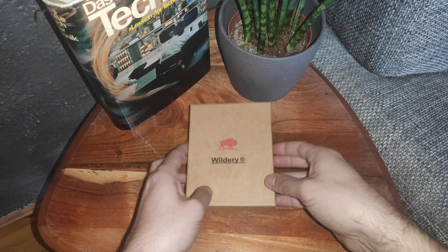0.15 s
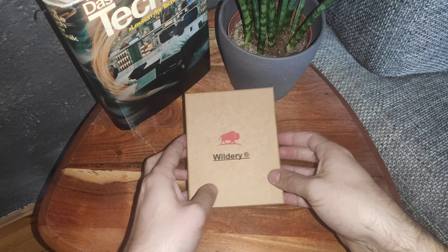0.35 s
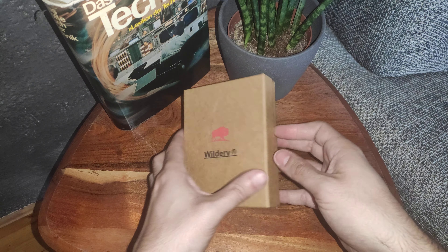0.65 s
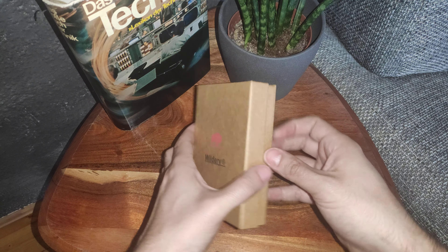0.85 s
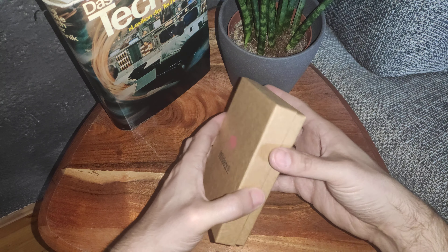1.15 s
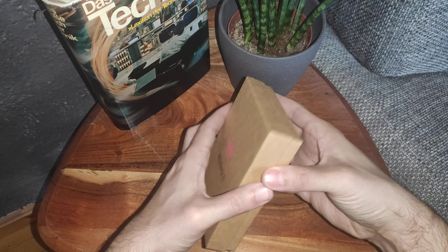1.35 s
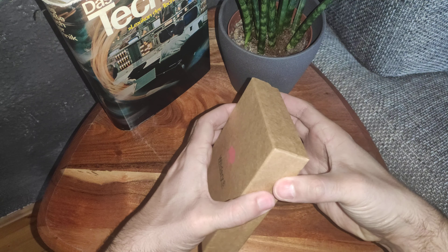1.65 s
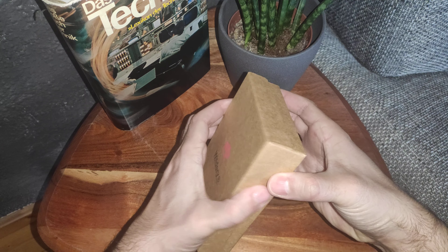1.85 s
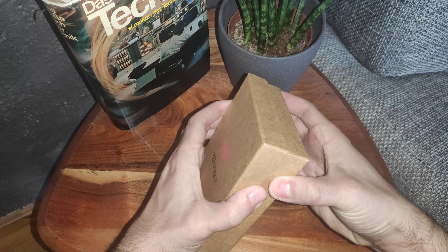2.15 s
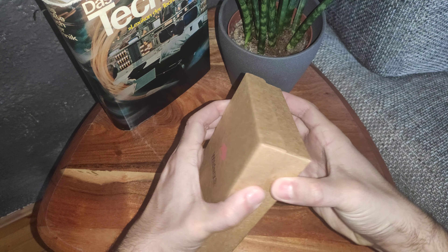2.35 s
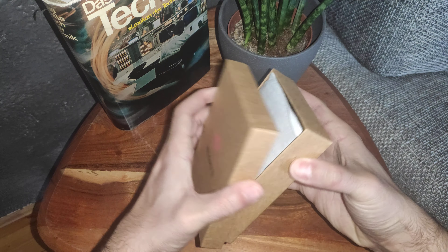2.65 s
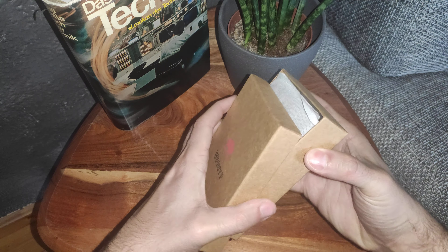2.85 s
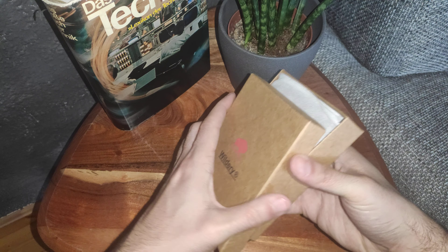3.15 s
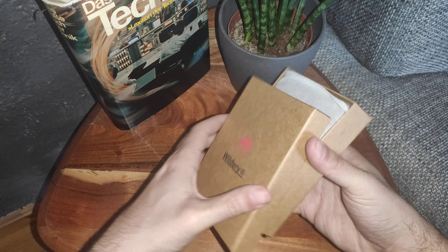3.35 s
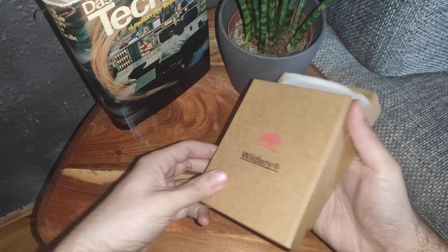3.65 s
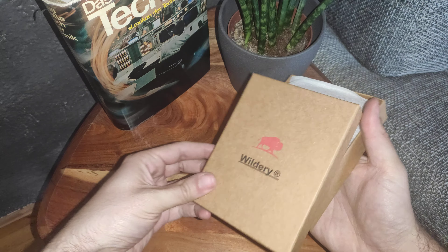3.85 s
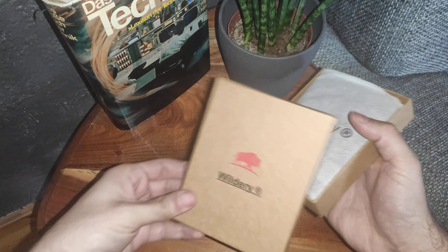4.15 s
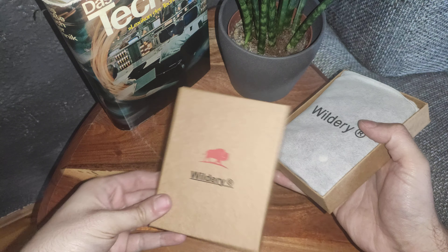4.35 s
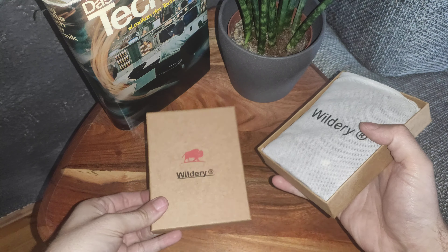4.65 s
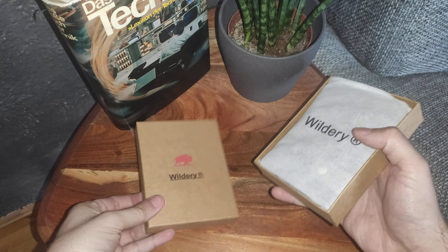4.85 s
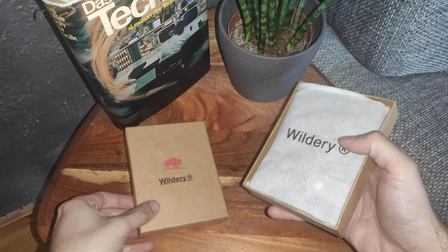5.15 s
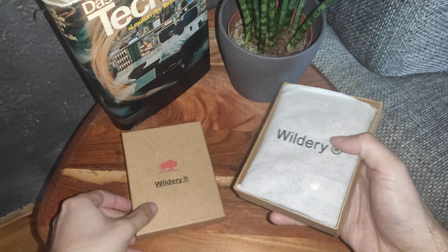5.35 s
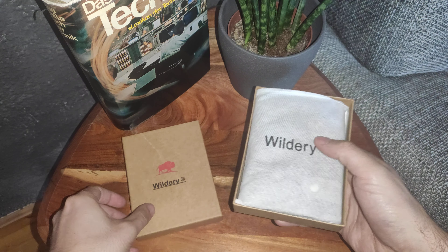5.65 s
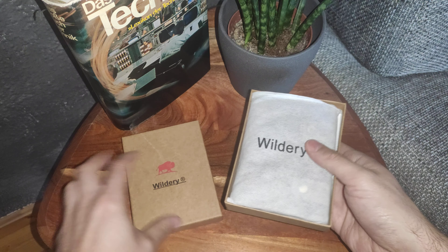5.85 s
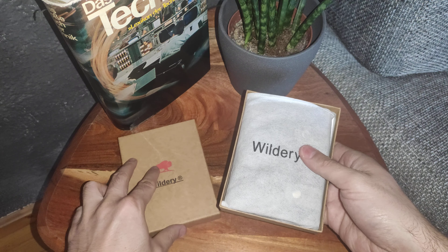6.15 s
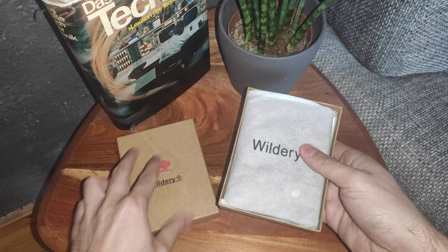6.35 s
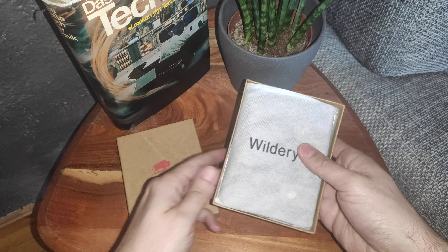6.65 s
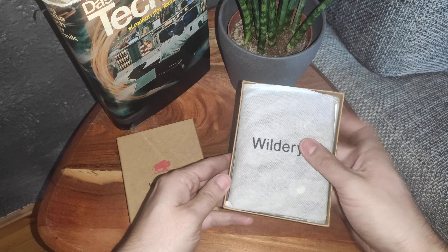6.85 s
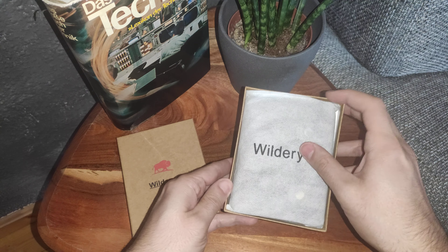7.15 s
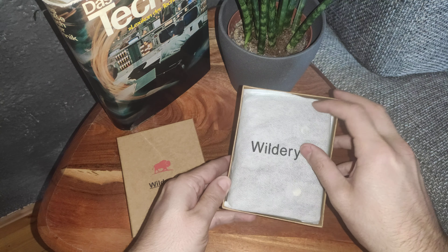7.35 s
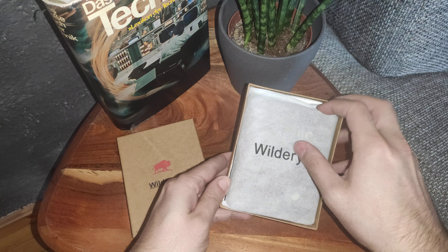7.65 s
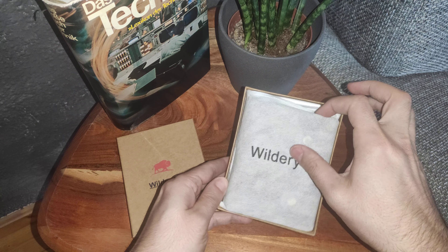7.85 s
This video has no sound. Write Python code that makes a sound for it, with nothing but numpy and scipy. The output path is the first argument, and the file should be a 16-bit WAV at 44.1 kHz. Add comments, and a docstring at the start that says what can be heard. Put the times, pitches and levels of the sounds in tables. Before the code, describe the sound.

Fingers brush and slip on a small hollow cardboard box, snapping and scraping as they work the lid loose and draw it off. The lid lands on a wooden table with a few sharp knocks, the loudest sounds here, and squeaks faintly before light handling resumes. The microphone is close, the sound leans left, and the small room adds a short, soft echo above a low hiss.

```python
"""Dry rubbing and fingertip ticks, close up: hands turn a small cardboard box and slide its lid off.
Skin hisses on the board, edges scrape, the panels hum and the hollow box booms; slips snap and thump.
About five seconds in, the lid knocks and bounces on a wooden table, then squeaks on the varnish.
A small soft room answers, over the microphones' own hiss and slow rumble."""
import sys
import numpy as np
from scipy import signal
from scipy.fft import rfft, irfft, next_fast_len
from scipy.io import wavfile
from scipy.ndimage import uniform_filter1d, map_coordinates

SR = 44100
rng = np.random.default_rng(int(sys.argv[2]) if len(sys.argv) > 2 else 0)


def put_to_file(sound):
    """Save the sound as 16-bit audio at rate SR, in the file named by the first command-line argument."""
    columns = np.atleast_2d(sound).T  # one column per channel
    safe = np.clip(columns, -1, 1)
    whole_steps = np.round(safe * 32767)
    wavfile.write(sys.argv[1], SR, whole_steps.astype(np.int16))


N = 353241

# Levels are relative; each layer adds its own trim.
# hand strokes: t/s, length/s, crest/share of length, panel level/dB,
# skin, edge and hollow levels re panel/dB, panel resonance/Hz
HAND_STROKES = [(0.096, 0.11, 0.23, -69, -14, -2, -0.5, 1450), (0.27, 0.11, 0.37, -83.5, 4, -3, 5.5, 650),
                (0.358, 0.06, 0.7, -72.5, 1, -12, -2, 650), (0.502, 0.21, 0.04, -73, 3.5, -5, 2, 690),
                (0.65, 0.23, 0.47, -63, -11.5, -7.5, -3.5, 1870),
                (0.828, 0.063, 0.45, -64.5, 2, 3, 3, 1610), (0.951, 0.096, 0.46, -52.5, -8, -4, -3, 1670),
                (1.018, 0.088, 0.5, -73, 8.5, 8, -12.5, 1530),
                (1.085, 0.29, 0.1, -74.5, 12.5, 5, -7.5, 1460),
                (1.288, 0.13, 0.87, -72, 10, 3.5, -10, 1500), (1.408, 0.086, 0.48, -69, 10, 2.5, -15, 1560),
                (1.513, 0.072, 0.55, -72.5, 4, 3.0, -6, 2100),
                (1.588, 0.084, 0.37, -66.5, 0.5, 4.0, -13.0, 2110),
                (1.646, 0.13, 0.42, -63, -9.5, -9, 7, 800),
                (1.777, 0.097, 0.28, -51.5, -14.5, -9, 0.5, 950),
                (1.949, 0.07, 0.12, -46.5, -18, -11, 1, 703), (2.001, 0.047, 0.2, -64, -20, -16, 15, 800),
                (2.045, 0.056, 0.07, -47.5, -14.5, -6.5, 4, 910),
                (2.191, 0.11, 0.2, -64.5, -16, -10, 6, 990),
                (2.279, 0.078, 0.4, -55.5, -20, -13, -1.5, 915),
                (2.344, 0.042, 0.15, -58, -19, -11, 9, 563),
                (2.418, 0.061, 0.75, -47, -16.5, -16, -1.5, 635), (2.447, 0.19, 0.2, -50, -6, 3, 1, 1950),
                (2.659, 0.18, 0.5, -56, -6.5, 3, -7, 760), (2.782, 0.11, 0.44, -56, -3.5, 5.0, -1, 1900),
                (2.877, 0.047, 0.5, -59.5, -9, 0.5, -3, 810), (2.971, 0.144, 0.9, -66.5, -2, -1, -5, 840),
                (3.106, 0.087, 0.36, -65.5, 6, 4, -5, 1900), (3.193, 0.11, 0.45, -58.5, -6.5, -2, -1, 1550),
                (3.266, 0.14, 0.67, -57.5, -5.5, 2, -7, 1290),
                (3.383, 0.14, 0.23, -63.5, -2.5, 4.5, -9, 1310),
                (3.48, 0.18, 0.48, -59, -1.5, 1.5, -22, 1270), (3.586, 0.31, 0.25, -58, 0.5, 2, -12, 1060),
                (3.798, 0.084, 0.4, -56.5, -6, -7, -20, 1260),
                (3.861, 0.18, 0.38, -50.5, -10.5, -7.5, -13, 1350),
                (3.998, 0.071, 0.47, -58.0, -9.0, -2, -14, 1270),
                (4.056, 0.17, 0.67, -46.5, -11, -4, -10.5, 1420),
                (4.179, 0.168, 0.3, -54.0, -9.5, 2.5, -5, 1390),
                (4.342, 0.372, 0.13, -78.5, 0.5, 1, -3.5, 695),
                (5.03, 0.06, 0.27, -76.0, 5.0, 9, -7.0, 1010),
                (5.096, 0.1, 0.24, -71.5, 3.5, 4, -7.0, 1010), (5.163, 0.17, 0.6, -61, -8.5, -4.5, -5, 990),
                (5.295, 0.14, 0.3, -60.5, -7, -1, -10.0, 905), (5.403, 0.16, 0.53, -61, -1, -5, -9, 870),
                (5.54, 0.23, 0.46, -62.5, -1.0, -1.5, -10, 940), (5.77, 0.2, 0.27, -75, 7, -7, -7.0, 740),
                (5.924, 0.18, 0.2, -69.5, 3, -4, -8, 890), (6.183, 0.11, 0.27, -57, -26, -13, -1.5, 773),
                (6.707, 0.12, 0.27, -77, 4, -7, -5, 760), (6.802, 0.19, 0.4, -68, 0.5, -5, -8, 730),
                (6.9, 0.14, 0.65, -68.5, 7.5, -4, -16, 2070),
                (7.02, 0.1, 0.3, -66.5, 3.0, 2.5, -16.5, 1730),
                (7.35, 0.06, 0.37, -68.5, -7, -0.5, -22, 795), (7.603, 0.17, 0.66, -71, -9, -14, -3.5, 710),
                (7.793, 0.15, 0.14, -68, -7.5, -8, -11, 1510),
                (7.922, 0.12, 0.58, -64, -6.5, -8.5, -17, 740)]
# the resting grip: panel, skin, edge and hollow levels/dB
GRIP_DB = (-83, -87.5, -81, -78)
# tone of skin on board: f/Hz, level/dB
SKIN_EQ = [(350, -36.5), (600, -25.5), (727, -9.5), (1190, -6), (2050, -1), (5340, -5), (8500, 4.5),
           (10300, -8), (13400, -6.5), (15700, -5.5)]
# tone of scraping edges: f/Hz, level/dB
EDGE_EQ = [(900, -37), (2000, -6.5), (3000, 1), (4000, 3.5), (4450, -1), (4900, 3), (6000, -3.5),
           (8800, -22), (10500, -36.5), (15000, -47.5)]
# rim resonances: f/Hz, width/Hz, boost/dB
RIM_PEAKS = [(2030, 140, 5.5), (2600, 88, 3), (3110, 140, 2.5), (3800, 92, 1.5), (4420, 150, 6.5)]
# tone of rubbed panels: f/Hz, level/dB
PANEL_EQ = [(250, -33), (750, -6.5), (1200, -8), (2200, -8.5), (3500, -19), (7000, -49)]
# air and walls of the box: f/Hz, width/Hz, level/dB
HOLLOW_PEAKS = [(134.6, 79, -6), (264, 120, -9), (344, 45, -4.5), (497, 83.7, 4), (668, 700, -3.5)]
# slips and fingertip ticks: t/s, level/dB, colour/Hz, treble/dB, thump/dB, t60/s
FINGER_SLIPS = [(0.806, -39.5, 1500, -26, -8, 0.071), (0.89, -40, 620, -20, -12, 0.033),
                (1.006, -37.5, 2640, -14.5, -30, 0.054), (1.258, -46.5, 1270, -7, -20, 0.047),
                (1.776, -49, 756, -31, -13, 0.056), (1.953, -37.5, 547, -7.5, -8, 0.083),
                (2.035, -42, 700, -38, -10, 0.038), (2.171, -51, 573, 3, -14, 0.14),
                (2.199, -49, 1060, -16, -10, 0.14), (2.289, -47.5, 950, -22, 3, 0.04),
                (2.335, -45.5, 797, -36, -6, 0.06), (2.422, -35.5, 520, -39, -20, 0.057),
                (2.534, -25.5, 563, -19, -2.5, 0.03), (2.686, -48, 810, -11, 7, 0.12),
                (2.815, -36, 2630, -36, -15, 0.042), (2.904, -45.5, 821, -6, -23, 0.039),
                (3.215, -41.5, 1500, -23, -17, 0.055), (4.078, -41, 2000, -36, -2, 0.045),
                (4.261, -33, 1330, -6.5, -2, 0.034), (7.378, -44, 794, -8, -28, 0.025),
                (7.471, -55.5, 745, -5.5, -3, 0.044), (7.551, -43.5, 1440, -24, -17, 0.044),
                (7.827, -52, 1430, -15, -11, 0.034)]
# thump of the held box: f/Hz, level/dB, t60/s
BOX_MODES = [(75, -18, .08), (136, 0, 0.064), (252, -1, 0.036), (400, -9, .035)]
# lid on table: t/s, level/dB, favoured pitch/Hz, thud/dB, crack/dB, hand damping (1 = free), contact/s
LID_KNOCKS = [(4.9757, -9, 1036, -24.5, -31.5, 1.54, 0.002), (5.0153, -20, 980, -20.5, -31, 2.3, 0.0011),
              (5.062, -30, 980, -12.5, -28, 1.2, 0.0026), (5.075, -37, 1060, -12, -29, 2.1, 0.0011),
              (5.7342, -7, 764, -29.5, -35, 2.6, 0.0023), (5.74, -8.5, 724, -44, -37, 1.34, 0.00079),
              (6.1372, -19, 795, -33, -49, 1.77, 0.002)]
# ring of the lid: f/Hz, level/dB, t60/s
LID_MODES = [(486.5, -14, 0.22), (593, -4, 0.081), (685, -25, 0.1275), (781, -1.5, 0.064), (845, 0, 0.055),
             (966, 0.5, 0.03), (1013, -7, 0.043), (1180, -9.5, 0.024), (1557, 7.5, 0.019),
             (1766, -8.5, 0.06), (1790, -4.5, 0.027), (1867, -13.5, 0.098), (2210, -8, 0.029),
             (2623, -9.5, 0.031), (3150, -16.5, 0.031), (3740, -34, .02), (3720, -19, 0.034),
             (4760, -33.5, .014)]
# thud of the table top: f/Hz, level/dB, t60/s
TABLE_MODES = [(179.3, -12.5, 0.042), (235, -0.5, 0.072), (286, -0.5, 0.11), (340, -3.5, 0.11)]
# lid edge on varnish: t/s, length/s, slip rate/Hz, level/dB
LID_SQUEAKS = [(6.188, .068, 794, -53), (6.287, 0.0356, 768, -48)]
# room decay: f/Hz, t60/s
ROOM_DECAY = [(150, 0.52), (700, 0.29), (2000, 0.35), (6000, 0.57), (14000, 0.23)]
# microphone rumble and hiss: f/Hz, level/dB
HISS_EQ = [(1.8, -28), (3.0, 7.5), (16, 3), (26, -6), (108, -18), (407, -28), (504, -36), (625, -29),
           (1280, -36.5), (1480, -35), (7410, -46), (8870, -41.5), (10600, -56), (14100, -43.5),
           (15700, -46)]
# stereo image of the friction: f/Hz, left-right correlation
FRICTION_LIKENESS = [(150, 0.93), (700, 0.91), (1500, 0.81), (3000, 0.26), (7000, 0.02)]
# pans of hands, lid and hiss: f/Hz, left over right/dB
HAND_BALANCE = [(60, 1.5), (180, 8), (550, 4), (1650, 6), (4970, 4.5), (15000, 7.5)]
LID_BALANCE = [(200, 4), (700, 5.5), (1650, 7.5), (5000, 16)]
HISS_BALANCE = [(60, 2.5), (180, 3.0), (550, 3.5), (1650, 5), (4970, 3), (15000, 3)]


def rubbing():
    """Skin hisses on the board, edges scrape, panels hum at a pitch set by the grip, the box booms."""
    times, power = strokes()
    db, skin_db, edge_db, hollow_db, grip_hz = np.transpose(HAND_STROKES)[3:]
    panel_rest, skin_rest, edge_rest, hollow_rest = GRIP_DB
    loudest = np.argmax(amp(2 * db)[:, None] * power, axis=0)  # this stroke sets the grip
    drag = wobble(25)  # the sliding speed stutters

    def fader(stroke_db, rest_db, stutter_db):
        level = np.sqrt(amp(2 * stroke_db) @ power + amp(2 * rest_db))
        return np.interp(np.arange(N) / SR, times, level) * amp(stutter_db * drag)

    def panel_tone(hz, t):
        pitch = np.interp(t, times, grip_hz[loudest])
        root, fifth = bell(hz + 1, pitch, 0.12), bell(hz + 1, 1.5 * pitch, 0.12)
        return amp(along(PANEL_EQ, hz) + 10 * root + 3.9 * fifth)

    skin_tone = lambda hz, t: amp(along(SKIN_EQ, hz))
    rim_db = lambda hz: sum(boost * resonance(hz, f, width) for f, width, boost in RIM_PEAKS)
    edge_tone = lambda hz, t: amp(along(EDGE_EQ, hz) + rim_db(hz))
    hollow_tone = lambda hz, t: sum(amp(level) * resonance(hz, f, w) for f, w, level in HOLLOW_PEAKS)
    skin = fader(db + skin_db + 3, skin_rest, stutter_db=0.46) * fibres(skin_tone, grain_db=1)
    edges = fader(db + edge_db - 1, edge_rest, stutter_db=0.75) * fibres(edge_tone, grain_db=2)
    panels = fader(db, panel_rest, stutter_db=0.91) * fibres(panel_tone, grain_db=2)
    hollow = fader(db + hollow_db - 2, hollow_rest, stutter_db=0.99) * fibres(hollow_tone, grain_db=0.9)
    return skin + edges + panels + hollow


def strokes():
    """Times and each stroke's power: the hand speeds up, slows down, and a faint rustle lingers."""
    start, length, share = np.transpose(HAND_STROKES)[:3, :, None]
    times = np.arange(0, N + 64, 64) / SR
    age = times - start
    crest = np.clip(share, 0.05, 0.95) * length
    rise = np.sin(np.pi / 2 * np.clip(age / crest, 0, 1)) ** 0.69  # a low power is abrupt
    fall = np.sin(np.pi / 2 * np.clip((length - age) / (length - crest), 0, 1)) ** 1.6
    linger = amp(-8) * decay(np.maximum(age - crest, 0), t60=0.34)
    return times, rise ** 2 * (fall ** 2 + linger ** 2)


def fibres(tone, grain_db, patch_db=3):
    """Stereo friction noise: fibres catch unevenly, in patches; tone(Hz, s) is a gain."""
    catches = amp(grain_db * wobble(550))
    hz, t, noise = signal.stft(rng.standard_normal((2, N)) * catches, SR, nperseg=512)
    patches = uniform_filter1d(rng.standard_normal(noise.shape[1:]), size=3, axis=0)
    patches = uniform_filter1d(patches, size=14, axis=1)
    gain = tone(hz[:, None], t)
    gain = gain / np.sqrt(np.mean(gain ** 2, axis=0)) * amp(patch_db * unit(patches))
    mid, side = noise * gain * stereo_width(hz)[:, :, None]
    return unit(signal.istft(np.array([mid + side, mid - side]), SR, nperseg=512)[1][:, :N])


def slips():
    """Each slip is a sharp burst of friction with its own colour; the box answers with a thump."""
    out, t = np.zeros((2, N + SR)), np.arange(SR // 5) / SR
    hz = np.fft.rfftfreq(len(t), 1 / SR)
    snap = 0.46 * decay(t, t60=0.0092)
    attack = 1 - np.exp(-t / 0.001)
    for start, db, colour_hz, treble_db, thump_db, t60 in FINGER_SLIPS:
        body = 1 / (1 + (np.log((hz + 1) / colour_hz) / 0.69) ** 2) ** 1.6
        treble = amp(treble_db + along(SKIN_EQ, hz))
        noise = rfft(rng.standard_normal((2, len(t))))
        mid, side = irfft(noise * (body + treble) * stereo_width(hz), len(t))
        burst = attack * (snap + decay(t, t60)) * unit(np.array([mid + side, mid - side]))
        thump = amp(thump_db - 5) * ringing(BOX_MODES, t)
        out[:, round(start * SR):][:, :len(t)] += amp(db - 6.5) * (burst + thump)
    return out[:, :N]


def knocks():
    """Where the lid lands decides which modes ring most; the table thuds beneath, the edge cracks."""
    out, t = np.zeros(N + SR), np.arange(SR // 4) / SR
    crack_band = signal.butter(3, [1600, 5600], "band", fs=SR)
    for start, db, pitch, thud_db, crack_db, damping, contact in LID_KNOCKS:
        modes = [(f, level + 14.1 * bell(f, pitch, 0.15), t60 / damping) for f, level, t60 in LID_MODES]
        noise = signal.lfilter(*crack_band, rng.standard_normal(len(t)))
        crack = amp(crack_db + 18.5) * decay(t, t60=0.02) * noise
        ring = ringing(modes, t)
        thud = amp(thud_db + 12) * ringing(TABLE_MODES, t)
        attack = 1 - np.exp(-t / contact)
        out[round(start * SR):][:len(t)] += amp(db - 12) * (attack * (ring + thud) + crack)
    return out[:N]


def ringing(modes, t):
    """Damped sines, a little different on every hit; loose board makes their phase wander."""
    out = np.zeros(len(t))
    for hz, db, t60 in modes:
        gain = amp(db + rng.normal(0, 0.37))
        wander = np.cumsum(uniform_filter1d(rng.standard_normal(len(t)), size=90)) * 7 / np.sqrt(SR)
        out += gain * decay(t, t60) * np.sin(2 * np.pi * hz * t + wander)
    return out


def squeaks():
    """Quick, uneven stick-slip gives a rough stack of overtones that sags as the lid slows."""
    out = np.zeros(N)
    waver, flutter_db = 0.039 * wobble(260), 5.3 * wobble(330)
    for start, length, hz, db in LID_SQUEAKS:
        span = slice(round(start * SR), round((start + length) * SR))
        sag = np.linspace(1.03, 0.96, span.stop - span.start)
        phase = 2 * np.pi * np.cumsum(hz * sag * (1 + waver[span])) / SR
        stack = sum(amp(-14 * np.log2(k) ** 1.05) * np.sin(k * phase) for k in range(1, 7))
        out[span] = amp(db + flutter_db[span]) * signal.windows.tukey(len(phase), 0.3) * stack
    return out


def room(send):
    """A small soft room: each frequency of the tail dies at its own speed."""
    hz, t, noise = signal.stft(rng.standard_normal((2, SR // 2)), SR, nperseg=256)
    tail = signal.istft(noise * decay(t, along(ROOM_DECAY, hz)[:, None]), SR, nperseg=256)[1]
    predelayed = np.pad(send, (260, 0))[None]
    return signal.fftconvolve(predelayed, tail / np.linalg.norm(tail[0]), axes=1)[:, :N]


def microphone_hiss():
    """Each microphone has its own hiss and slow rumble."""
    tone = lambda hz: amp(along(HISS_EQ, hz)) * pan(along(HISS_BALANCE, hz))
    return unit(filtered(rng.standard_normal((2, N)), tone))


def amp(db):
    """Gain of a level in dB."""
    return 10 ** (np.asarray(db) / 20)


def decay(t, t60):
    """A fade of 60 dB every t60 seconds."""
    return amp(-60 * t / t60)


def unit(x):
    """x at rms 1."""
    return x / np.sqrt(np.mean(x ** 2) + 1e-20)


def along(points, hz):
    """Curve through (Hz, value) points on a log axis."""
    f, value = np.transpose(points)
    return np.interp(np.log(hz + 1), np.log(f + 1), value)


def bell(hz, centre, log_width):
    """An EQ bell of height 1."""
    return np.exp(-(np.log(hz / centre) / log_width) ** 2)


def resonance(hz, centre, width):
    """A resonant peak of height 1."""
    return 1 / (1 + (2 * (hz - centre) / width) ** 2)


def pan(db):
    """Left and right gains, db apart."""
    return np.array([amp(db / 2), amp(-db / 2)])


def stereo_width(hz):
    """Mid and side gains of the friction: narrow lows, wide highs."""
    angle = np.arccos(along(FRICTION_LIKENESS, hz)) / 2
    return np.array([np.cos(angle), np.sin(angle)])


def filtered(x, response):
    """x through a complex frequency response."""
    size = next_fast_len(N + SR // 2)
    return irfft(rfft(x, size) * response(np.fft.rfftfreq(size, 1 / SR)), size)[..., :N]


def wobble(rate):
    """A smooth random curve, rate knots a second."""
    return map_coordinates(rng.standard_normal(int(N * rate / SR) + 4), [np.arange(N) * rate / SR])


def scene():
    """Hands, lid and room, all louder on the left; the lid reaches the right side 0.12 ms earlier."""
    lid = knocks() + squeaks()
    lag = lambda hz: np.exp(np.outer([-1j, 1j], np.pi * hz * 0.00012))
    panned_lid = filtered(lid, lambda hz: pan(along(LID_BALANCE, hz)) * lag(hz))
    hands = filtered(rubbing() + slips(), lambda hz: pan(along(HAND_BALANCE, hz)))
    send = amp(-8) * lid + amp(-12) * hands.mean(0)
    return hands + panned_lid + pan(5.3)[:, None] * room(send)


def record(dry):
    """A bed of hiss goes under the scene, then a brick-wall high cut."""
    hiss_db, high_cut_hz = -52, 15850
    return filtered(dry + amp(hiss_db) * microphone_hiss(), lambda hz: hz < high_cut_hz)


dry = scene()
out = record(dry)
put_to_file(out)
```